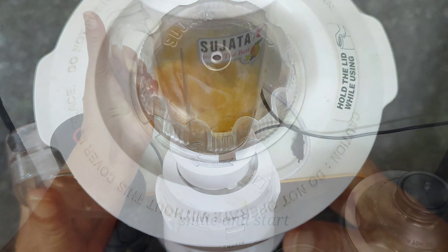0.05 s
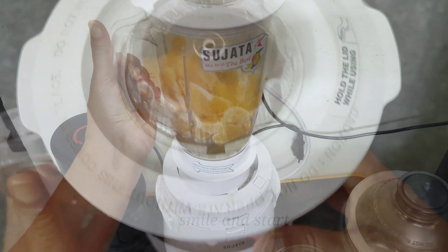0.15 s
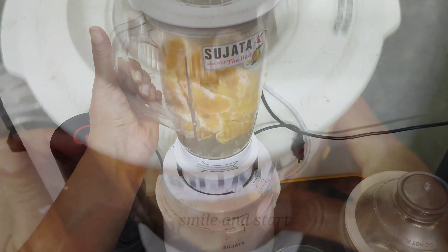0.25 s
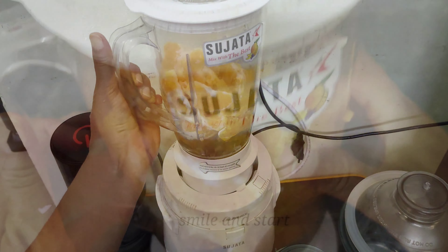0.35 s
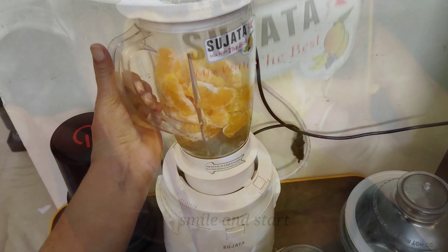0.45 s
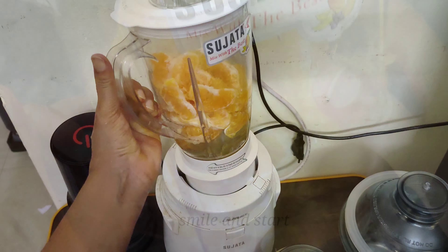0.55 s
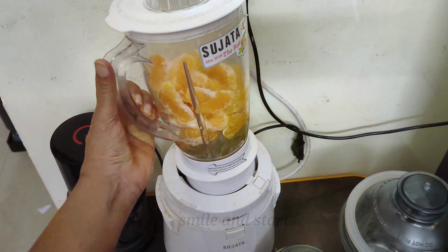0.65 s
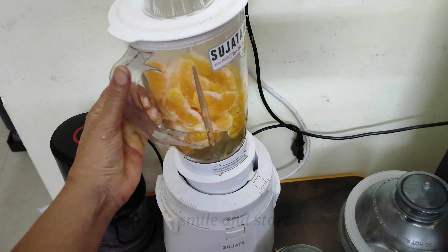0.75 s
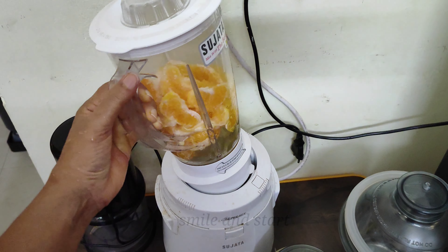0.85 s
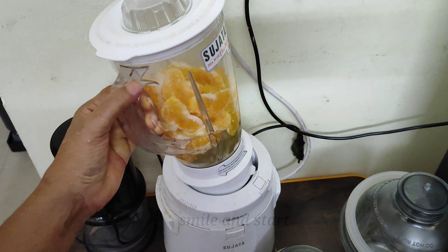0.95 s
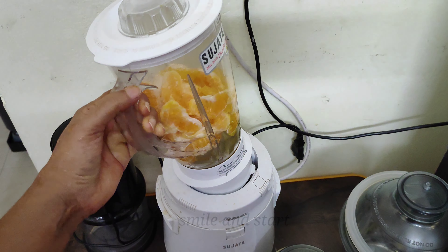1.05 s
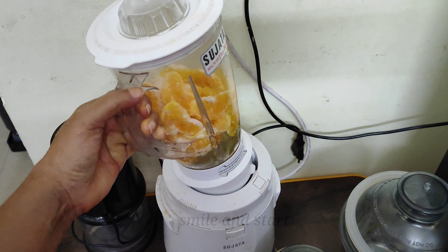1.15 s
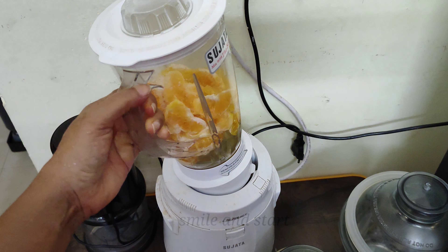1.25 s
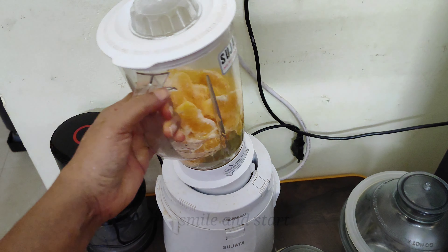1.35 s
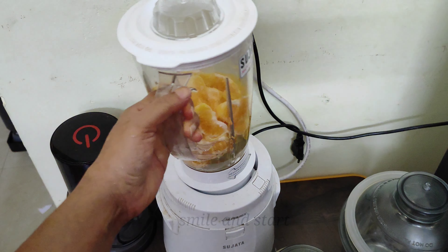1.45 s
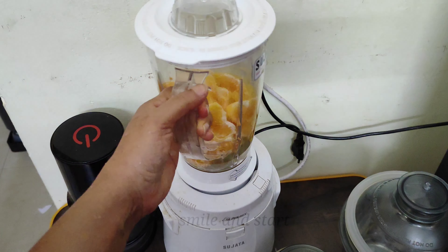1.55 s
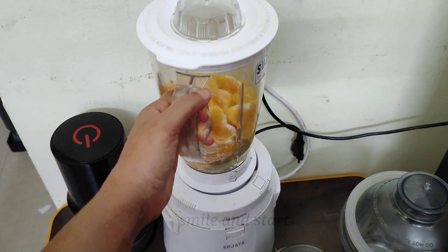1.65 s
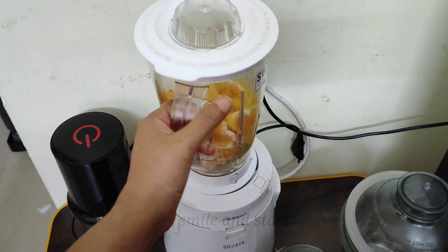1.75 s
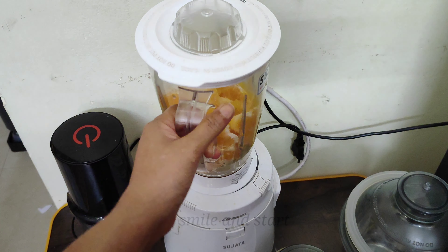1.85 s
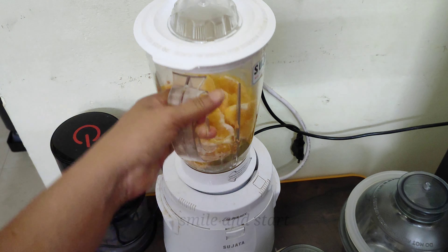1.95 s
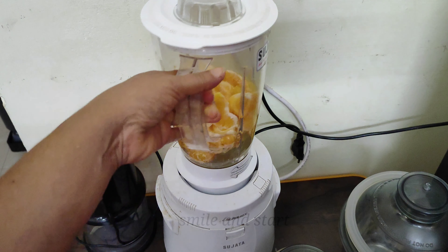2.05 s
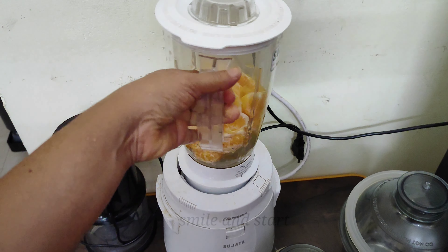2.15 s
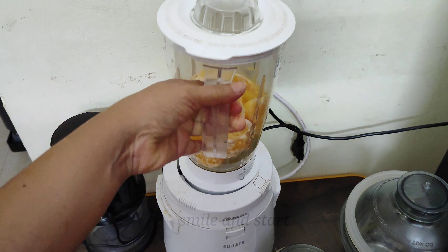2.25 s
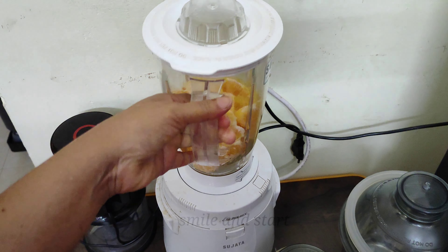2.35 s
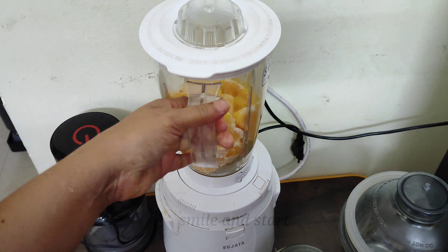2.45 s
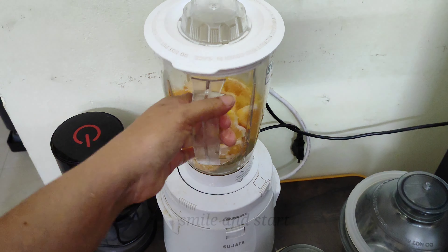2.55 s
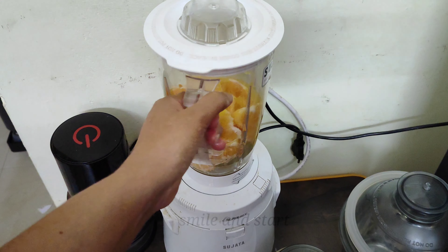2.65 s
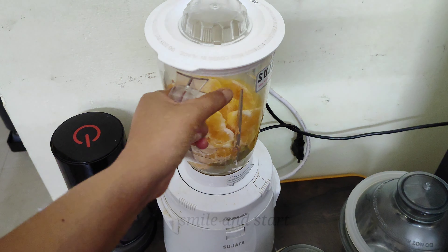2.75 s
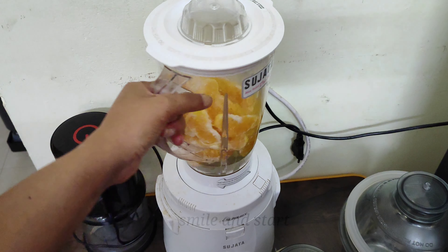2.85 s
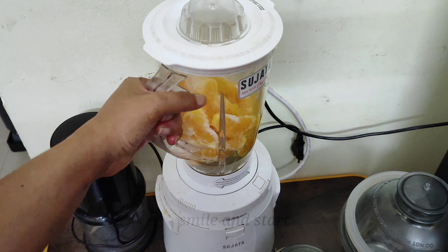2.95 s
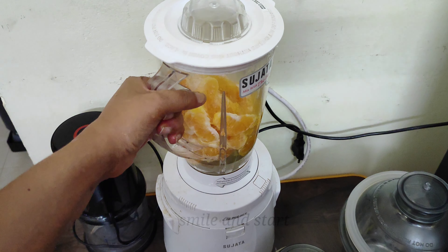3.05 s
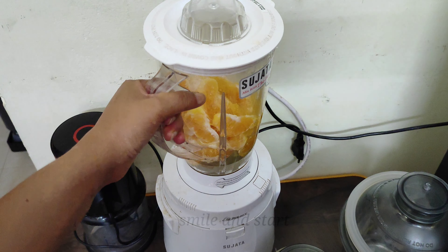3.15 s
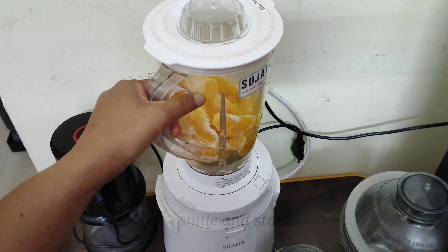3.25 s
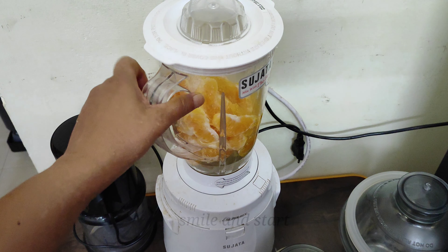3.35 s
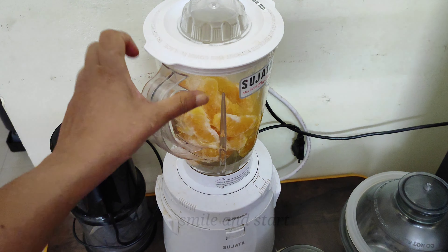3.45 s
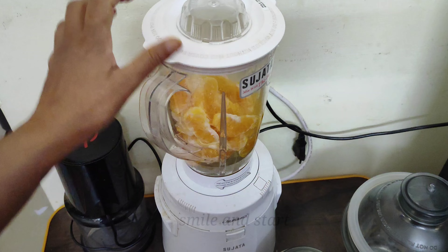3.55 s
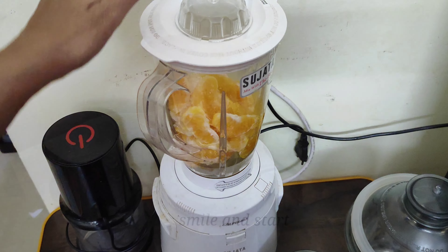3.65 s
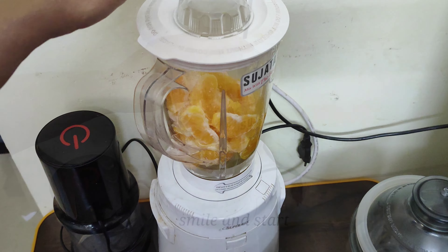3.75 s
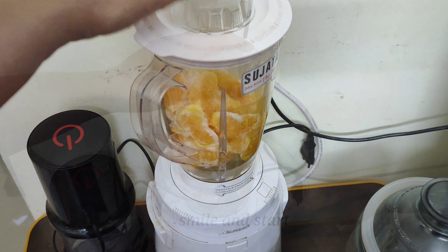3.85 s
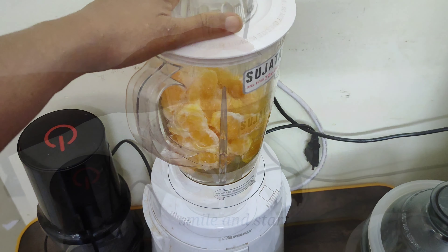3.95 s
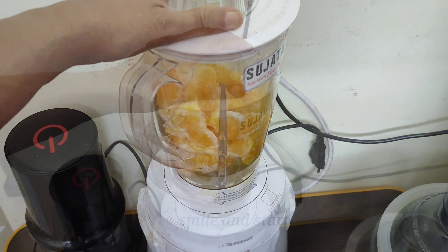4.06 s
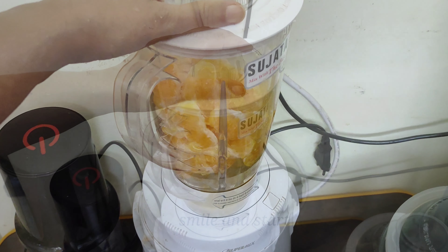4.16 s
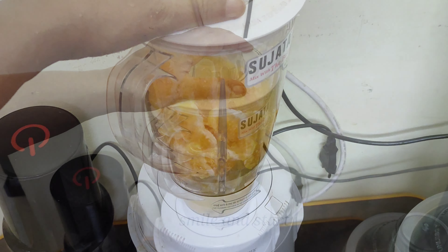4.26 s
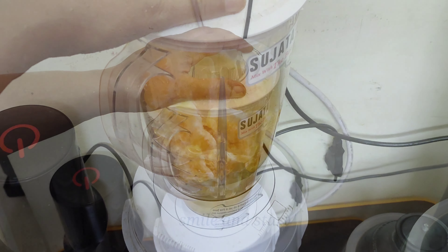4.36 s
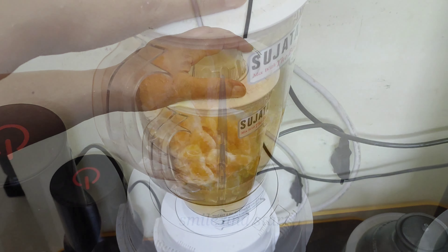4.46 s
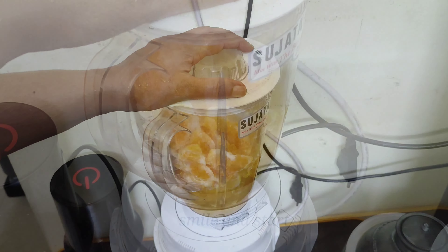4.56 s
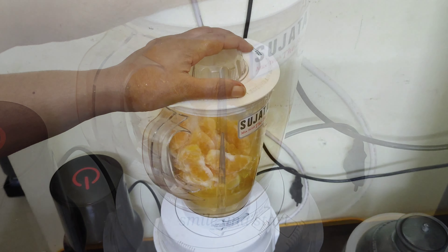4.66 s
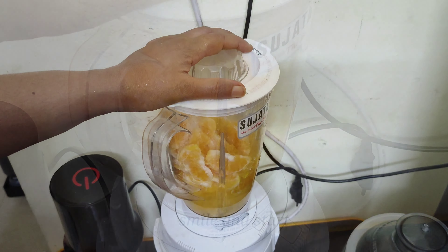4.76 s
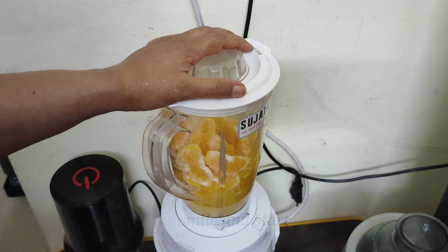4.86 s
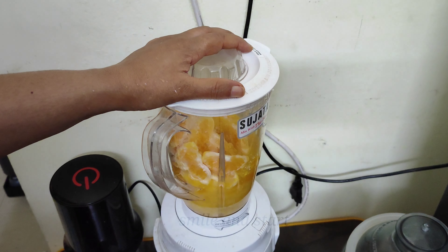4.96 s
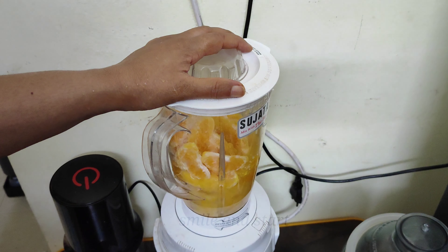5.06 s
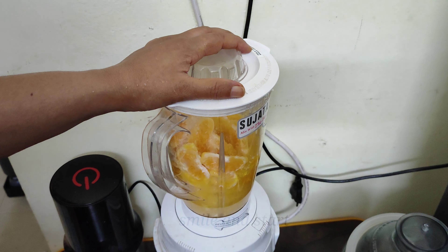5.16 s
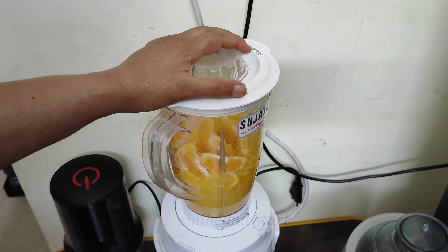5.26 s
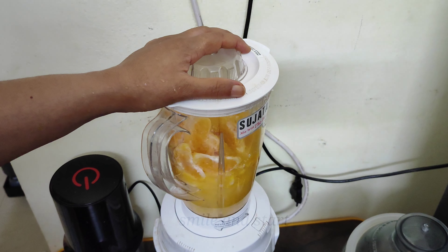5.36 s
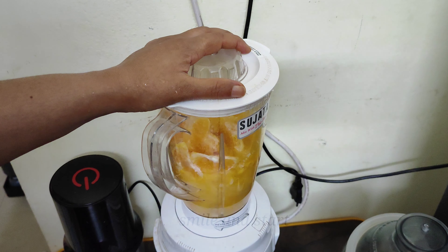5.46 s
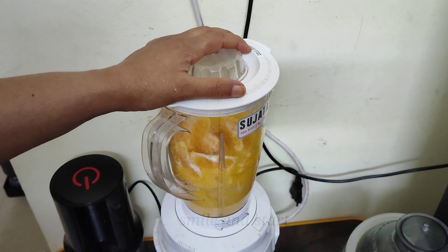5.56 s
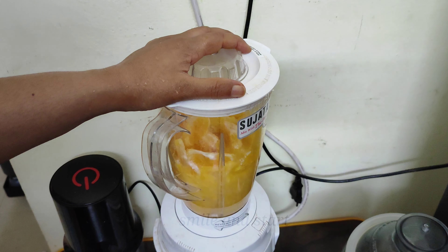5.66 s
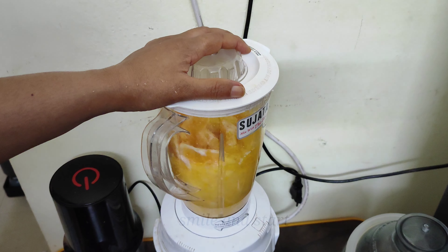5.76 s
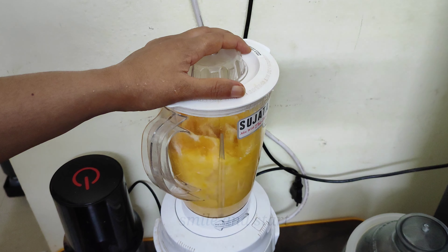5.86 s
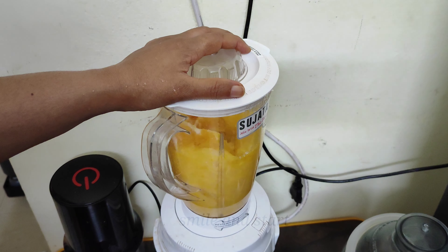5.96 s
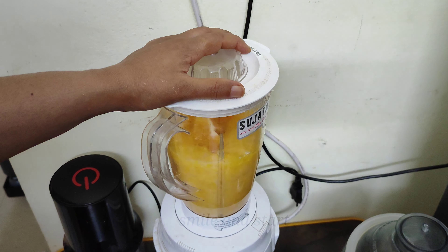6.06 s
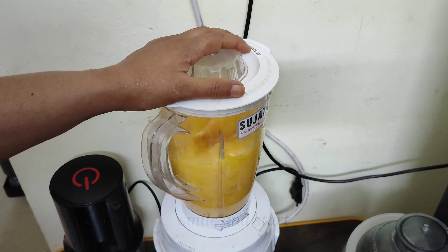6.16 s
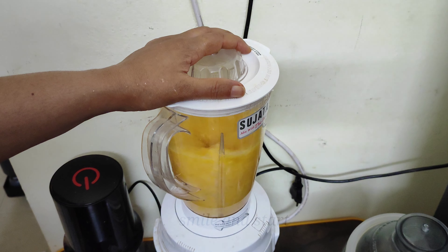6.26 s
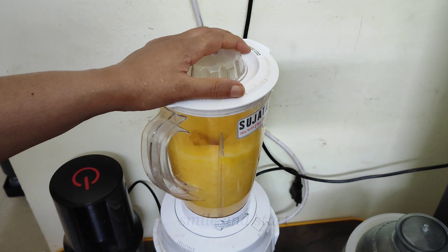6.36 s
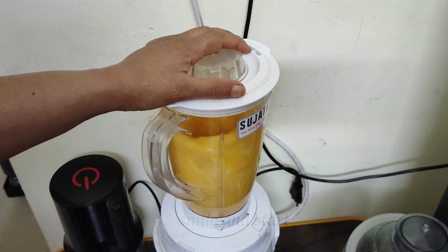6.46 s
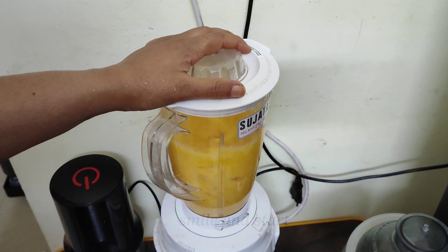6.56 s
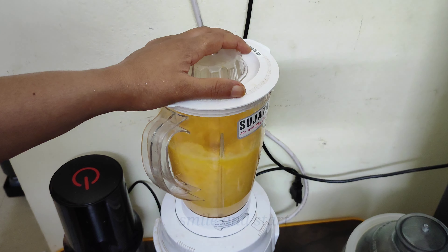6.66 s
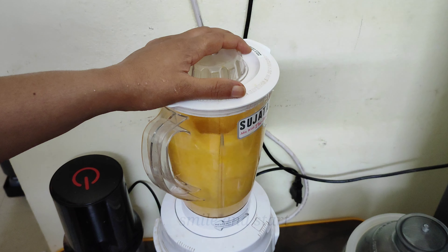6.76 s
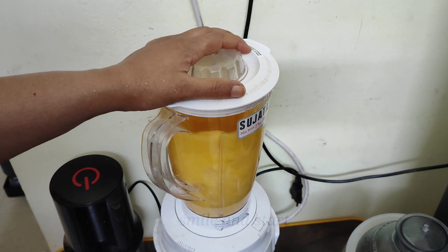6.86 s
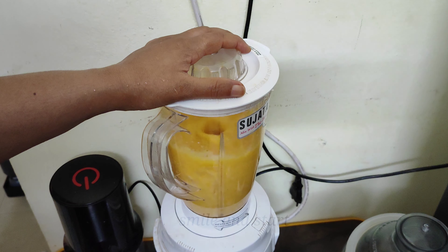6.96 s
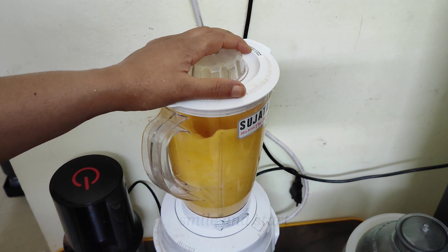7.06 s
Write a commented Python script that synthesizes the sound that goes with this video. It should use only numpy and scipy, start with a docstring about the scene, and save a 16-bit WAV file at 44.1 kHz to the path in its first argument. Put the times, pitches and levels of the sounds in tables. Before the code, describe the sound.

In a small, hard-walled kitchen, a plastic blender jar is twisted onto its base with uneven knocks, clacks and light scrapes. After a brief lull, a palm thumps the lid and a switch snaps. The motor starts at once, rising quickly to a high whine over the roar of blades in pulp, while fruit pieces pelt the ringing jar. The blender is very loud and close, slightly overloading the microphones.

```python
"""A faint squeal, then knocks and scrapes: a plastic blender jar full of fruit is twisted onto its base
in a small kitchen with hard walls. After four seconds a palm thumps the lid, the switch snaps, and the
motor races up to about 14000 turns a minute. The fan and the commutator (the motor's spinning contacts)
whine over the roar of the blades in the pulp, while pieces of fruit pelt the jar and make it ring.
It is all close enough to overload the microphones."""
import sys
import numpy as np
from scipy import signal
from scipy.fft import rfft, irfft, next_fast_len
from scipy.io import wavfile
from scipy.ndimage import uniform_filter1d, map_coordinates

SR = 44100
rng = np.random.default_rng(int(sys.argv[2]) if len(sys.argv) > 2 else 0)


def digitize_waveform(pressure):
    """Quantize a signal to 16-bit integers and store it at the path in sys.argv[1].

    Rows of a 2-D input are taken as channels; values are limited to [-1, 1].
    """
    field = np.atleast_2d(pressure).T
    bounded = np.clip(field, -1, 1)
    quanta = np.round(bounded * 32767).astype(np.int16)
    wavfile.write(sys.argv[1], SR, quanta)


N = 313478
TIME = np.arange(N) / SR
START_S, FREE_TURNS_PER_S = 4.1545, 238.8  # when the motor starts; its top speed with nothing dragging
MAINS_HZ = 50

# Noise colours, or how strong a noise is at each pitch (f/Hz, level/dB)
ROOM_NOISE = [(15, -44), (25, 4), (101, 7.5), (319, -0.5), (532, -4.5), (733, -6), (2960, -14),
              (3470, -14.5), (3760, -15), (5630, -21), (7980, -25), (9620, -25), (15200, -20)]  # the quiet kitchen
RUB_NOISE = [(50, -23), (110, -7), (200, -8), (350, -11), (700, -8), (1400, -15.5), (3000, -26),
             (7000, -43), (15000, -48)]  # plastic sliding on plastic
THUD_NOISE = [(50, -42), (110, -2.5), (190, 9), (320, -3.5), (450, -11.5), (1200, -46)]  # the low push of a knock
CLACK_NOISE = [(300, -11.5), (800, 9.5), (1400, 14), (2300, 10), (3300, -2), (4500, -1.5), (7000, -10),
               (15000, -55)]  # the middle of a knock
TICK_NOISE = [(1000, 7.5), (3500, 8), (7000, -7), (10000, 3), (12500, -8), (16000, -7.5)]  # the bright edge of a knock
SNAP_NOISE = [(1000, -14), (3000, -4.5), (7000, -11.5), (10000, -5), (13000, -8), (16000, 6)]  # the switch
LUMP_NOISE = [(30, -24), (60, -22), (90, -10), (140, 5.5), (220, -0.5), (500, -60)]  # tumbling fruit
CHURN_NOISE = [(25, -26), (45, -40), (75, -32), (130, -8), (200, -1), (270, 5), (420, 3.5), (600, -0.5),
               (850, 4), (1300, -31.5)]  # pulp being stirred
CHOP_NOISE = [(300, -15.5), (700, -11), (1100, 1), (1500, 2), (1900, 2.5), (2250, -1), (2750, 0),
              (3000, -15.5), (3400, -9), (4300, -8), (6000, -59)]  # fruit being cut
AIR_NOISE = [(2000, -42), (4000, 7.5), (6000, 11.5), (7600, 6.5), (9500, 7), (12000, 0.5), (14500, 2),
             (16000, -33)]  # the fan's draught

# Modes, the notes a thing rings at; narrow ones ring longer (f/Hz, width/Hz, level/dB)
SQUEAL_MODES = [(3700, 90, 4), (4120, 250, -5)]  # the faint opening squeal
JAR_MODES = [(279, 35, -5.5), (329, 33, -9), (405.3, 16, -12), (530, 59, -1.5), (669, 16.5, -7),
             (742, 45, -5), (840, 60, 0.5), (1077, 58, -7), (1330, 26, -9.5), (1385, 40, -11),
             (1684, 60, -6), (1870, 75, -14), (2286, 62, -6.5), (2800, 33, -14.5), (3382, 44, -8),
             (4230, 19, -21.5)]  # the jar on its base
BASE_MODE = (188, 46, -6)  # the base's single boom under every thud
JAR_AIR_MODES = [(390.7, 7.3, -7), (673, 4.3, -7.5), (1336, 9.3, -1)]  # the air inside the jar
HOLLOW_MODES = [(1151, 27, -4), (1215.6, 24.5, 0.5), (1291, 75, -2), (1357, 124, -8)]  # the jar pelted with fruit
HOUSING_MODES = [(314, 17, -10), (455, 80, -7), (715, 15.5, -1), (826, 47, -5), (930, 99, -2),
                 (1065, 33, -2), (1497, 48, -9.5), (2304, 54, -6.5), (2513, 68, -4), (2782, 150, -7),
                 (3185, 116, -7.5), (3422, 88, -9.5), (5660, 27, -19)]  # the running machine

# The casing makes these pitches louder as the motor's tones sweep through (f/Hz, width/Hz, boost/dB)
CASING_BOOSTS = [(167, 38, 12), (2280, 440, 15.5), (4170, 400, 16), (5730, 130, 5), (6850, 400, 7),
                 (10100, 1500, 9.5), (14150, 800, 8.5)]
# Pitch ranges that are louder or quieter on each side # One list for the left, one for the right (f/Hz,
# width/Hz, change/dB)
SIDE_COLOURS = [
    [(1230, 340, 0.5), (2720, 790, 1), (7600, 980, -31), (12200, 650, 0)],
    [(742, 16, 7), (8757, 303, 9), (9333, 487, 14.5), (10120, 390, 6), (10800, 200, 0), (10800, 970, 7.5),
     (12030, 600, 13)],
]
# How alike the left and right sides are (f/Hz, likeness from 0 to 1)
STEREO_LIKENESS = [(40, 0.26), (120, 0.98), (240, 1), (470, 0.89), (940, 0.21), (2000, 0.15), (4000, 0.13),
                   (12000, 0.11)]
# The kitchen's echo; t60 is the time a sound takes to fade by 60 dB (f/Hz, t60/s)
ECHO_TIMES = [(120, 0.83), (300, 0.44), (1000, 0.48), (4000, 0.45), (12000, 0.35)]
# The jar slides on its seat, timed at the hardest push (t/s, rub level/dB, scrape level/dB)
JAR_SLIDES = [(0.47, -35.5, -52), (0.701, -49, -77), (0.9, -31, -38), (0.98, -37, -56), (1.12, -38.5, -59),
              (1.7, -35.5, -65), (2.22, -40, -49), (2.5, -33, -66), (2.8, -42.5, -50.5), (2.98, -51, -48),
              (3.15, -42, -76), (3.8, -66, -61)]
# The jar hits the base; a sharp edge is hard and ticks, a flat face is soft and thuds
# (t/s, level/dB, hardness/dB, thud f/Hz, extra thud/dB, extra low push/dB, f/Hz that this spot favours)
JAR_KNOCKS = [(0.257, -44, 2, 260, -1, -1, 1100), (0.315, -20.5, -0.5, 266, 6.5, 6, 1960),
              (0.435, -32, -4, 208, -6, -5, 900), (0.473, -34.5, -8, 268, -6, -6, 1490),
              (0.519, -38, -5, 200, -2, 2.5, 400), (0.609, -31, -11, 197, 4, 2, 753),
              (0.644, -35.5, -8, 274, -7, -5, 945), (0.706, -46, -10, 105, 6, -3, 400),
              (0.734, -41.5, 8.5, 204, -5, -11, 804), (0.86, -37, -6.5, 248, -2, 6, 750),
              (0.879, -14, 11.5, 298, -3, -11, 1456), (0.893, -10.5, -1.5, 290, 0, -7.5, 1690),
              (0.903, -15, -1, 254, 3.5, 5.5, 760), (0.912, -21.5, -3, 300, -7.5, -3, 1400),
              (0.96, -32, 0.5, 255, -7, -6, 1400), (0.972, -20, 1, 255, 1, 4, 740),
              (0.989, -26.5, 9, 300, -9, -2, 846), (1.083, -31, -12, 330, -2, -4, 800),
              (1.1, -27, -8, 300, -4, -6, 1080), (1.122, -32, 3, 297, -4, -6, 1090),
              (1.236, -56.5, 27, 200, -2, 1, 3015), (1.343, -41.5, 4, 200, 1, -2, 1330),
              (1.455, -38.5, 1, 293, -2, 1.5, 280), (1.539, -29.5, 5, 220, 4, 2, 800),
              (1.565, -13, 3, 200, 3, -2.5, 1340), (1.849, -40.5, -9, 211, -10, 1, 617),
              (1.938, -40.5, 10.5, 203, 10, 7, 1290), (2.049, -26, -0.5, 306, 2.5, -3, 530),
              (2.12, -35, -12, 200, -6, -5, 670), (2.206, -40, -15, 300, 0, 2, 400),
              (2.25, -27.5, 19, 203, 5, -2, 1600), (2.257, -12, 1, 293, -0.5, -0.5, 1460),
              (2.479, -27, -1, 202, 0.5, -2, 390), (2.55, -42, -15, 200, -3, 3, 400),
              (2.683, -31.5, 8, 205, 2.5, 11, 895), (2.746, -33, -1, 305, 7, -4, 378),
              (2.823, -46, -5, 322, -4, -1, 400), (3.015, -27.5, 0, 327, 5, -6, 1030),
              (3.022, -24.5, -5, 327, 4, -2, 1250), (3.05, -30.5, -11, 329, -8, -11, 1310),
              (3.111, -30.5, -3, 270, -7, -9, 1180), (3.132, -36.5, -13, 274, -7, -6.5, 1290),
              (3.223, -38, -13, 220, -13, -6, 920), (3.539, -52, 0, 220, -9, -2.5, 1300),
              (3.829, -60.5, 15, 220, -1, -4, 1300)]
# The palm lands on the lid and settles (t/s, level/dB)
LID_PATS = [(4.028, 0.5), (4.067, -8)]
# The tones of the starting growl (multiple of the mains frequency, level/dB)
GROWL_TONES = [(2, -3), (4, -3), (6, -8)]
# The motor's tones (multiple of the turning speed, level/dB, roughness 0 to 1, power of speed it grows by)
MOTOR_TONES = [(1, -24.5, .1, 1.6), (2, -22, .5, 4), (4, -31, .5, 3), (5, -28, .4, 2), (6, -30, .7, 2),
               (12, -23.5, .6, 1), (24, -31, .7, 1.8), (36, -28, .85, 4), (38, -29.5, .95, 8),
               (48, -29.5, .9, 2.6), (60, -35, .92, 2)]
# How loud the tumbling fruit and the jar's hollow note are as time passes (t/s, level/dB)
LUMP_LEVELS = [(4.17, -36), (4.42, -25), (4.7, -29), (5.1, -25.5), (5.8, -43), (6.3, -35), (6.6, -26),
               (7.1, -25)]
HOLLOW_LEVELS = [(4.2, -27.5), (4.3, -22.5), (4.47, -11), (4.9, -11.5), (5.1, -9.5), (5.22, -14),
                 (5.32, -9.5), (5.6, -12), (5.83, -14.5), (6.1, -13.5), (6.4, -13), (6.66, -11), (6.8, -13),
                 (6.95, -23), (7.06, -11)]
# Big pieces hit the blades (t/s, f/Hz, level/dB)
BIG_CHUNKS = [(4.201, 170, -17), (4.25, 526, -11), (4.3, 426, -15), (4.359, 518, -1), (4.49, 530, -4.5),
              (4.561, 330, -6), (5.169, 242, -13), (5.37, 450, -5), (5.471, 222, -11.5), (6.1, 403, -11),
              (6.22, 470, -4), (6.43, 203, -3), (6.6, 232, -14)]
# Fruit drags on the blades (t/s, turns a second lost, half length/s)
FRUIT_DRAGS = [(5.49, 3.5, .06), (5.83, 7, .07), (6.04, 5, .1), (6.49, 13, .1), (6.9, 9, .055)]
# The flow of fruit into the blades swells or falters (t/s, change/dB)
FEED_SURGES = [(4.8, -5), (5.0, 2), (5.33, 4.5), (5.62, 2.5), (5.86, -7.5), (5.92, 1.5), (6.0, -4),
               (6.06, 2), (6.15, -4.5), (6.31, 0), (6.54, 0), (6.69, 2.5), (6.77, -2), (6.96, -4.5),
               (7.06, 3.5)]


def amp(db):
    """Turn decibels into a number to multiply by."""
    return 10 ** (np.asarray(db) / 20)


def unit(x):
    """Scale x to an average strength (rms) of 1."""
    return x / np.sqrt(np.mean(np.abs(x) ** 2) + 1e-20)


def along(points, hz):
    """Read between the rows of an (f/Hz, value) table, on a log pitch scale."""
    f, values = np.transpose(points)
    return np.interp(np.log(hz + 1), np.log(f + 1), values)


def level_curve(points):
    """Join (t/s, level/dB) points with straight lines."""
    return np.interp(TIME, *np.transpose(points))


def wobble(rate):
    """A smooth random curve through `rate` new values a second."""
    return map_coordinates(rng.standard_normal(int(N * rate / SR) + 4), [TIME * rate])


def bump(s, half_length):
    """A smooth bump of height 1 around time s."""
    return np.exp(-((TIME - s) / half_length) ** 2)


def add(track, s, x):
    """Mix x into the track at time s."""
    part = track[:, round(s * SR):][:, :x.shape[-1]]
    part += x[..., :part.shape[-1]]


def filtered(x, response):
    """Turn each frequency of x up or down by response(hz)."""
    n = x.shape[-1]
    padded = next_fast_len(n + SR // 8)
    return irfft(rfft(x, padded) * response(np.fft.rfftfreq(padded, 1 / SR)), padded)[..., :n]


def colour(points):
    """The filter response for a noise colour."""
    return lambda hz: amp(along(points, hz))


def body(modes):
    """The filter response of a thing that rings at these modes."""
    return lambda f: sum((-1) ** k * amp(db) * 1j * f * width / (hz * hz - f * f + 1j * f * width)
                         for k, (hz, width, db) in enumerate(modes))


def change_db(rows, hz):
    """Add up a table's peaks and dips at this frequency."""
    return sum(db * np.exp(-2 * ((hz - centre) / width) ** 2) for centre, width, db in rows)


def noise(response, size=N):
    """Coloured stereo noise, nearly the same on both sides in the bass."""
    def shares(hz):
        spread = np.arccos(np.clip(along(STEREO_LIKENESS, hz), 0, 1)) / 2
        return response(hz) * np.array([np.cos(spread), np.sin(spread)])
    mid, side = filtered(rng.standard_normal((2, size)), shares)
    return unit(np.array([mid + side, mid - side]))


def burst(points, t60, attack):
    """A puff of coloured noise that starts quickly and dies away (times in seconds)."""
    t = np.arange(SR // 4) / SR
    puff = noise(colour(points), size=len(t)) * amp(-60 * t / t60) * (1 - np.exp(-t / attack))
    return unit(puff) * np.sqrt(t60)


def ringing(modes, attack, scatter_db=2, blur=2, size=SR // 4):
    """A struck thing's fading notes; grip and rattling contact change their pitch and strength."""
    t = np.arange(size) / SR
    hz, width, db = np.transpose(modes)[:, :, None]
    hz = hz * np.exp(rng.normal(0, .006 * blur, hz.shape))
    phase = rng.uniform(0, 2 * np.pi, hz.shape)
    phase = phase + rng.normal(0, 1, (2,) + hz.shape) * np.minimum(hz / 1200, 2)  # heard from two places
    rattle = np.cumsum(rng.standard_normal((len(hz), size)), 1) * hz / SR * blur  # blurs high notes most
    fade = amp(db + rng.normal(0, scatter_db, hz.shape)) * np.exp(-np.pi * width * t)
    notes = fade * np.sin(2 * np.pi * hz * t + phase + rattle)
    ring = signal.sosfilt(signal.butter(4, 5000, fs=SR, output="sos"), notes.sum(1))
    return unit(ring * (1 - np.exp(-t / attack))) / 10


def kitchen_echo(x, build_up_s=0.0027):
    """The hard walls throw x back, and each pitch fades at its own speed."""
    hz, t, bands = signal.stft(noise(np.ones_like, size=3 * SR // 4), SR, nperseg=256)
    fade = amp(-60 * t / along(ECHO_TIMES, hz)[:, None])
    tail = signal.istft(bands * fade * (1 - np.exp(-t / build_up_s)), SR, nperseg=256)[1]
    return signal.fftconvolve(x, tail / np.linalg.norm(tail[0]), axes=1)[:, :x.shape[-1]]


def squeal(db=-61):
    """A thin, faint squeal swells and fades at the start."""
    return amp(db + 2.6 * wobble(28)) * bump(0.12, half_length=0.28) * noise(body(SQUEAL_MODES))


def jar_rubbing(rise_s=0.037, fall_s=0.098, stick_db=3.5, grain_db=3):
    """Each slide swells and eases off; the plastic catches unevenly and scrapes."""
    s, rub_db, scrape_db = np.transpose(JAR_SLIDES)[:, :, None]
    push = np.exp(np.minimum((TIME - s) / rise_s, (s - TIME) / fall_s))
    rub = (amp(rub_db) * push).sum(0) * noise(colour(RUB_NOISE))
    scrape = (amp(scrape_db) * push).sum(0) * amp(grain_db * wobble(280)) * noise(colour(TICK_NOISE))
    return amp(stick_db * wobble(42.2)) * (rub + scrape)


def struck_at(modes, spot_hz, boost_db=9.5, octaves=0.41):
    """The spot that is hit brings out the modes near one pitch."""
    return [(hz, width, db + boost_db * np.exp(-(np.log2(hz / spot_hz) / octaves) ** 2))
            for hz, width, db in modes]


def jar_knocks(firm_db=-19.5, echo_db=-4.5):
    """Each knock thuds through the base, clacks, ticks and leaves the jar and its air ringing."""
    out = np.zeros((2, N))
    for s, db, hard_db, thud_hz, thud_db, push_db, spot_hz in JAR_KNOCKS:
        force_db = db - firm_db  # above a firm blow; the clack grows faster with it than the thud
        weight = amp(0.71 * force_db - 0.48 * hard_db)
        thud = weight * amp(-19 + thud_db) * ringing([(thud_hz, 25, 0), BASE_MODE], attack=0.002)
        push = weight * amp(-25.5 + push_db) * burst(THUD_NOISE, t60=0.088, attack=0.0022)
        clack = amp(-24.5 + 1.36 * force_db) * burst(CLACK_NOISE, t60=0.047, attack=0.0014)
        ring = amp(-9.5 + force_db) * ringing(struck_at(JAR_MODES, spot_hz), attack=0.0021)
        tick = amp(-31 + force_db + hard_db) * burst(TICK_NOISE, t60=0.021, attack=0.0063)
        hit = np.pad(thud + push + clack + ring + tick, ((0, 0), (0, SR // 2)))
        add(out, s, hit + amp(echo_db) * kitchen_echo(hit))
        add(out, s, amp(-24 + force_db) * ringing(JAR_AIR_MODES, attack=0.008, blur=1, size=SR // 2))
    return out


def lid_thump(hz=194, t60=0.081, boom_db=-6, slap_db=-33, tick_db=-44, echo_db=-18):
    """A palm slaps the lid and makes it boom."""
    out, t = np.zeros((2, N)), np.arange(SR // 4) / SR
    boom = np.sin(2 * np.pi * hz * t) * amp(-60 * t / t60) * (1 - np.exp(-t / 0.003)) ** 2
    for s, db in LID_PATS:
        slap = amp(slap_db) * burst(RUB_NOISE, t60=0.14, attack=0.0042)
        tick = amp(tick_db) * burst(TICK_NOISE, t60=0.055, attack=0.0024)
        add(out, s, amp(db) * (amp(boom_db) * boom + slap + tick))
    return out + amp(echo_db) * kitchen_echo(out)


def switch_snap(s=4.130, snap_db=-2, echo_db=-3):
    """The switch snaps, bright and short."""
    out = np.zeros((2, N))
    add(out, s, amp(snap_db) * burst(SNAP_NOISE, t60=0.017, attack=0.005))
    return out + amp(echo_db) * kitchen_echo(out)


def coil_hum(running, hum_db=-35, growl_db=-30, growl_fade_s=0.44):
    """Mains power makes the motor's coils hum, unsteady under load; the starting current adds a growl."""
    phase = 2 * np.pi * MAINS_HZ * TIME + .25 * wobble(9)
    hum = amp(hum_db + 5.1 * wobble(4.5)) * np.sin(2 * phase)
    growl = sum(amp(db) * np.sin(multiple * phase) for multiple, db in GROWL_TONES)
    fade = np.exp(-np.maximum(TIME - START_S, 0) / growl_fade_s)
    return running * (hum + amp(growl_db) * growl * fade)


def tumbling_lumps(running, uneven_db=5):
    """Whole pieces tumble over the blades with uneven low thumps."""
    thumps = unit(amp(uneven_db * wobble(22)) * noise(colour(LUMP_NOISE)))
    return running * amp(level_curve(LUMP_LEVELS)) * thumps


def hollow_note(running, flutter_db=1.5):
    """Flying fruit keeps the jar ringing on its hollow note."""
    level_db = level_curve(HOLLOW_LEVELS) + flutter_db * wobble(30)
    return running * amp(level_db) * noise(body(HOLLOW_MODES))


def fruit_hits(speed, bits_per_s=85, bit_hz=900, bit_db=-19, t60=0.081):
    """Fruit knocks on blades and wall: a few big pieces, and many bits that hit harder with speed."""
    out, t = np.zeros((2, N)), np.arange(SR // 5) / SR
    hits = [(s, hz, amp(db)) for s, hz, db in BIG_CHUNKS]
    count = round(bits_per_s * (N / SR - START_S))
    times, chances = rng.uniform(START_S, N / SR, count), rng.standard_normal((count, 2))
    for s, (pitch, strength) in zip(times, chances):
        pace = speed[int(s * SR)] / FREE_TURNS_PER_S
        hits.append((s, bit_hz * 2 ** (0.95 * pitch), amp(bit_db + 3.8 * strength) * pace))
    fade = amp(-60 * t / t60) * (1 - np.exp(-t / 0.0017))  # the wall rings briefly
    for s, hz, gain in hits:
        notes_hz = hz * np.exp(rng.normal(0, .08, (3, 1)))
        phase = rng.uniform(0, 2 * np.pi, (3, 1)) + rng.normal(0, 1, (2, 3, 1)) * hz / 800
        add(out, s, gain * np.sin(2 * np.pi * notes_hz * t + phase).sum(1) / 2 * fade)
    return out


def motor_speed(spin_up_s=0.31):
    """Turns a second: the motor races up and sags whenever fruit drags on the blades."""
    age = np.maximum(TIME - START_S, 0)
    drag = sum(lost * bump(s, half_length) for s, lost, half_length in FRUIT_DRAGS)
    return FREE_TURNS_PER_S * (1 - np.exp(-age / spin_up_s)) - (age > 0) * drag


def motor_whine(speed, running, jolt=0.00347):
    """Shaft, blade, fan and commutator tones rise and grow with speed, and pulse with the mains."""
    angle = 2 * np.pi * np.cumsum(speed * (1 + jolt * wobble(30))) / SR  # fruit jolts the shaft
    pace = speed / speed.max()
    angle = angle + .011 * pace ** 8 * np.sin(angle)  # the spinning part sways once a turn
    pulsing = 1 + .25 * np.cos(4 * np.pi * MAINS_HZ * TIME)  # twice in each mains cycle
    tones = np.zeros((2, N))
    for multiple, db, rough, growth in MOTOR_TONES:
        smear_hz = 40 * multiple ** .55  # higher tones are smeared more widely
        flutter = np.array([wobble(smear_hz) + 1j * wobble(smear_hz) for side in range(2)])
        gain = amp(db + change_db(CASING_BOOSTS, multiple * speed) + 1.6 * wobble(18)) * pace ** growth
        texture = np.sqrt(2 * (1 - rough)) + np.sqrt(rough) * flutter
        tones += gain * np.real(texture * np.exp(1j * multiple * angle))
    return running * pulsing * tones


def shifting_pulp(x, depth_db=2):
    """Pitch ranges swell and fade on their own as the pulp covers and bares the walls."""
    bands = signal.stft(x, nperseg=1024)[2]
    patches = uniform_filter1d(rng.standard_normal(bands.shape[1:]), size=4, axis=0)  # smooth over pitch
    patches = uniform_filter1d(patches, size=5, axis=1)  # and over time
    gain = unit(amp(depth_db * unit(patches)))
    return signal.istft(bands * gain, nperseg=1024)[1][:, :N]


def blade_roar(speed, running, churn_db=-15.5, chop_db=-9.5, air_db=-21, brush_db=-40, slosh_db=1.04):
    """The blades churn the pulp and pelt the walls with fruit at every turn, while the fan blows air."""
    pace = np.maximum(speed / FREE_TURNS_PER_S, 0)
    feed_db = sum(db * bump(s, half_length=0.024) for s, db in FEED_SURGES) + 0.5 * wobble(14)
    angle = 2 * np.pi * np.cumsum(speed) / SR
    grit = amp(2 * wobble(400) + 2.46 * wobble(40))
    strikes = unit((1 + 0.064 * np.cos(angle)) * grit)
    churn = amp(churn_db + 1.5 * wobble(23)) * pace ** 0.44 * noise(colour(CHURN_NOISE))
    chop = amp(slosh_db * wobble(14)) * strikes * noise(colour(CHOP_NOISE))
    ring = amp(slosh_db * wobble(14)) * unit(filtered(strikes * noise(np.ones_like), body(HOUSING_MODES)))
    cutting = amp(chop_db + feed_db) * pace ** 1.07  # slow blades stir more than they chop
    juice_db = 1.2 * (TIME - START_S)  # the hiss grows as the fruit turns to juice
    draught = amp(air_db + juice_db + feed_db) * pace ** 1.75
    hiss_gain = np.hypot(draught, amp(brush_db))  # the motor's brushes hiss from the first turn
    hiss = hiss_gain * amp(1.36 * wobble(30)) * noise(colour(AIR_NOISE))
    return running * shifting_pulp(churn + cutting * (chop + ring) + hiss)


def scene(room_db=-51, echo_db=-6):
    """Jar, lid, switch and running blender, over the quiet noise of the kitchen."""
    speed = motor_speed()
    running = np.clip((TIME - 4.160) / 0.012, 0, 1)  # fades quickly from off (0) to on (1)
    room = amp(room_db) * noise(colour(ROOM_NOISE))
    blender = motor_whine(speed, running) + blade_roar(speed, running)
    blender += fruit_hits(speed) + hollow_note(running)
    echo = amp(echo_db) * kitchen_echo(blender)
    opening = jar_knocks() + jar_rubbing() + squeal() + lid_thump() + switch_snap()
    rumble = tumbling_lumps(running) + coil_hum(running)
    return room + opening + rumble + blender + echo


def record(dry, clip_sharpness=9, top_hz=15650):
    """Each side gets its own colour, the left comes a little earlier, and loud peaks are flattened."""
    lag_s = np.array([[-2], [2]]) / SR
    def sides(hz):
        return amp([change_db(side, hz) for side in SIDE_COLOURS]) * np.exp(-2j * np.pi * hz * lag_s)
    heard = filtered(dry, sides)
    clipped = heard / (1 + np.abs(heard) ** clip_sharpness) ** (1 / clip_sharpness)
    return filtered(clipped, lambda hz: np.clip((top_hz - hz) / 400, 0, 1))  # cut the highest treble


dry = scene()
out = record(dry)
digitize_waveform(out)
```